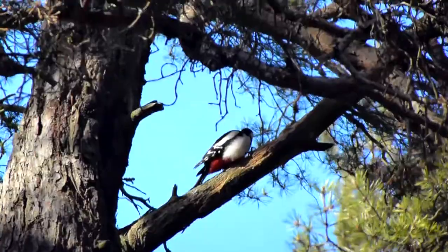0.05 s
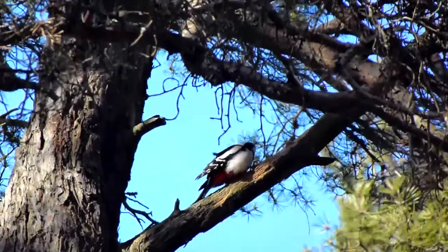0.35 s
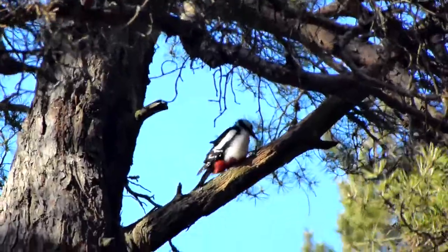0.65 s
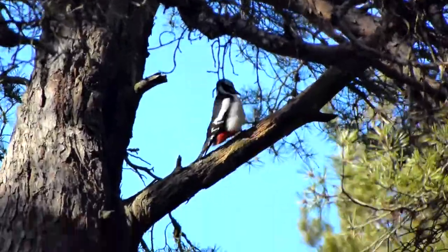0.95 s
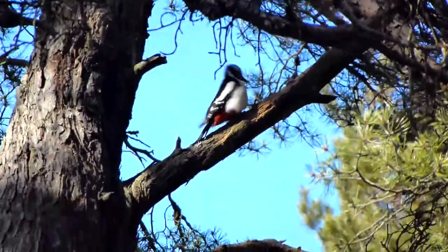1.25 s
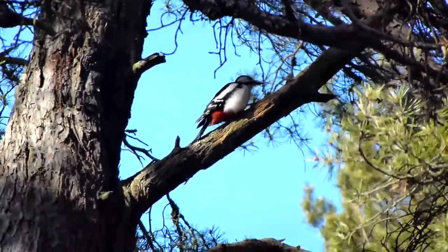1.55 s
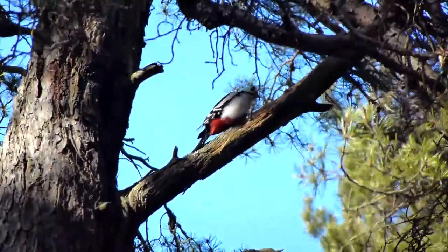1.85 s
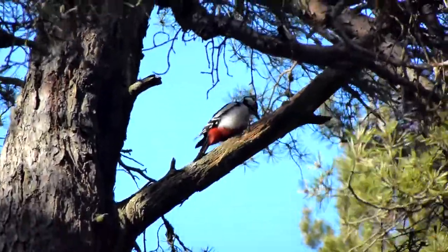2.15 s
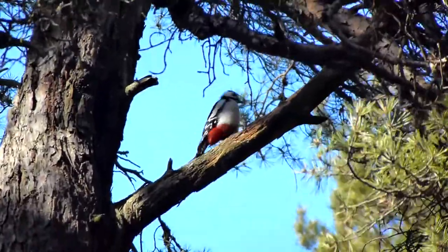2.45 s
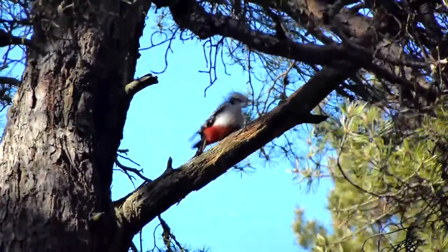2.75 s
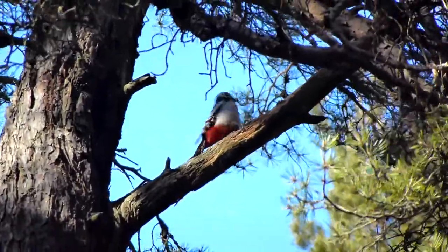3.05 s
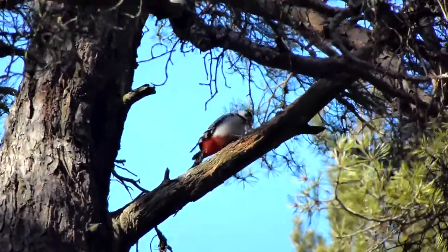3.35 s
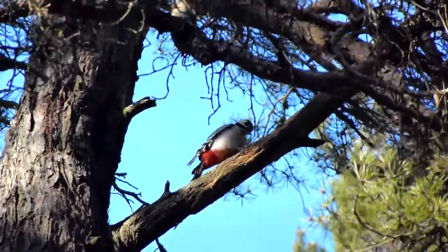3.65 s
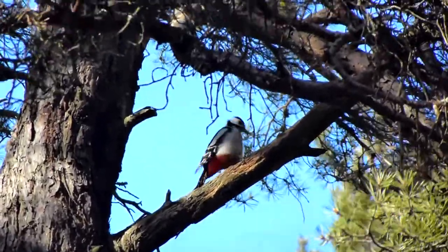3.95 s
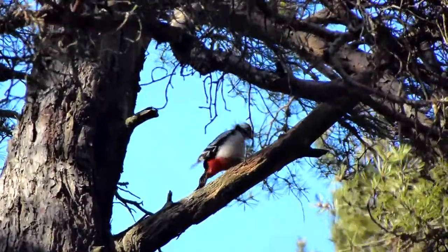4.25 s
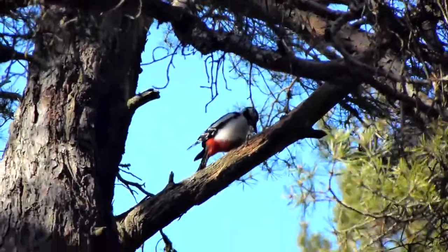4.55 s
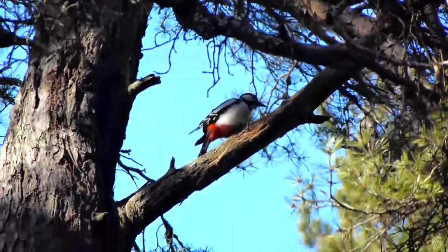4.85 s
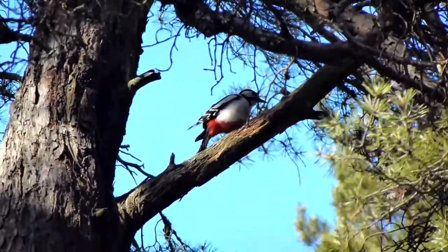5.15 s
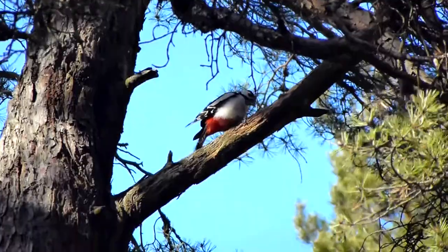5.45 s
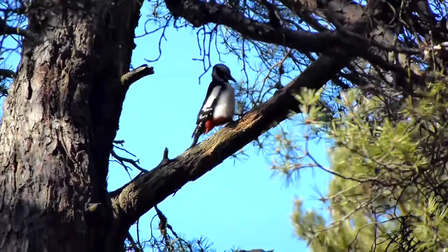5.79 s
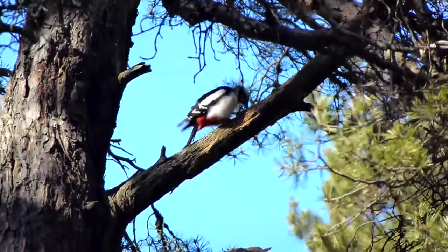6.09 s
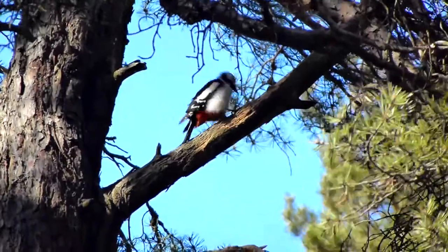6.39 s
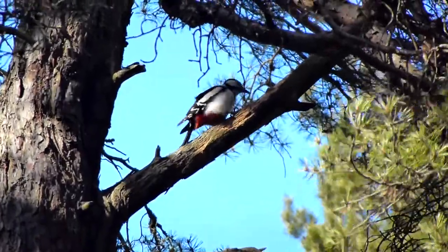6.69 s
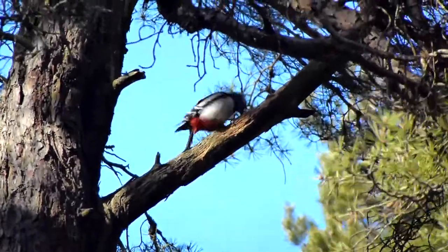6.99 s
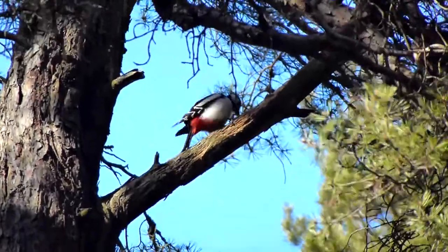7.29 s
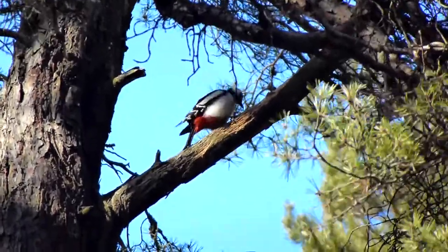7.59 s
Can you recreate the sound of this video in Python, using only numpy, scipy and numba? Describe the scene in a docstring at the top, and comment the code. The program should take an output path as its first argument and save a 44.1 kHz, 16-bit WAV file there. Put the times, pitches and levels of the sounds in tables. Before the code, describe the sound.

Wind buffets the microphone for the whole eight seconds with a low, uneven rumble and soft thumps, leaning slightly left. It is the loudest sound: gusty until about 2.7 seconds, lighter until 4, hardest from 4.2 to 5.4, easing around 6, then gusting again from 6.4. Underneath, a woodpecker pecks a dry pine branch in quiet, irregular single blows, each a sharp tick with a bark crack or short woody knock. The clearest fall near 1.1, 2.2, 2.7, 2.9 and 4.1 seconds, with a busier run from 5.2 to 7.3 and a few tiny bark scrapes. Far off, small birds give faint, thin two-note whistles at about 1.3, 3.9 and 6.7 seconds, and quick high raspy chirps between 2.3 and 3.7. A soft, steady rush of treetops lies behind everything.

```python
"""Woodpecker in a breezy wood

A woodpecker pecks and pries at a dry pine branch: the bark ticks and cracks, the wood knocks.
Gusts rumble and thump on a camera's two microphone openings (ports). Behind them the treetops
rush softly and small birds whistle and chirp far off. The camera turns everything down
in the strong gusts and slowly comes back up."""
import sys
import numpy as np
from scipy import signal
from scipy.fft import rfft, irfft, next_fast_len
from scipy.io import wavfile
from scipy.ndimage import uniform_filter1d
from numba import njit

SR = 44100
rng = np.random.default_rng(int(sys.argv[2]) if len(sys.argv) > 2 else 0)


def store_wav(level_fs):
    """Save 16-bit WAV to argv[1]."""
    pcm = np.round(np.clip(np.atleast_2d(level_fs), -1, 1) * 32767)
    wavfile.write(sys.argv[1], SR, pcm.T.astype(np.int16))


N = 345303


def undb(db):
    """Turn decibels into a gain to multiply by."""
    return 10 ** (np.asarray(db) / 20)


def unit(x):
    """Scale to an average strength (rms) of 1."""
    return x / np.sqrt(np.mean(x ** 2))


def curve(points):
    """Join (time, value) points with straight lines, one value a sample."""
    return np.interp(np.arange(N) / SR, *np.transpose(points))


def colour(x, spectrum):
    """Shape the tone of x by (frequency, level) points."""
    hz, db = np.transpose(spectrum)
    size = next_fast_len(x.shape[-1])
    f = np.fft.rfftfreq(size, 1 / SR)
    gain = undb(np.interp(np.log(f + 1), np.log(hz), db))
    return irfft(rfft(x, size) * gain, size)[..., :x.shape[-1]]


def noise(spectrum, channels=2):
    """A separate shaped noise for each channel, of strength 1."""
    return unit(colour(rng.standard_normal((channels, N)), spectrum))


def burst(t, decay_s, spectrum):
    """A dying puff of shaped noise that starts after one millisecond."""
    dying = rng.standard_normal(len(t)) * np.exp(-t / decay_s)
    return unit(colour(np.roll(dying, SR // 1000), spectrum))


def walk(rate):
    """Smooth random wandering of size 1, with `rate` turns a second."""
    hold = max(int(SR / rate), 2)
    steps = np.repeat(rng.standard_normal(N // hold + 2), hold)
    return unit(uniform_filter1d(uniform_filter1d(steps, hold), hold)[:N])


def flicker(rate, depth_db):
    """A restless gain of strength 1."""
    return unit(undb(depth_db * walk(rate)))


def pan(db):
    """Left and right gains of unchanged total power; positive leans left."""
    gains = undb(np.array([db, -db]).reshape(2, -1) / 2)
    return gains / np.sqrt(np.mean(gains ** 2, axis=0))


def ports(x, lead_ms):
    """A sound from a little to the left reaches the left port first."""
    t = np.arange(N) / SR
    return np.array([x, np.interp(t - lead_ms / 1000, t, x)])


def add(track, s, x):
    """Mix x into the track at s seconds."""
    i = max(int(s * SR), 0)
    track[..., i:i + x.shape[-1]] += x[..., :max(N - i, 0)]


def woodland_echo(x, fade_s, level_db, top_hz):
    """Trunks and needles scatter a dull echo that falls 60 dB in fade_s."""
    t = np.arange(SR // 2) / SR
    tail = rng.standard_normal((2, len(t))) * 1000 ** (-t / fade_s) * (1 - np.exp(-t / 0.0078))
    tail = signal.sosfilt(signal.butter(1, top_hz, fs=SR, output="sos"), tail)
    tail /= np.sqrt(np.sum(tail ** 2) / 2)
    return undb(level_db) * signal.fftconvolve(x[None], tail, axes=1)[:, :N]


def treetops(hiss_db=-14.5):
    """Far treetops rush, much alike in both ports, with a fine, quieter hiss."""
    # level of the background rush and hiss, which sinks briefly near 3.9 s: (time [s], level [dB])
    loudness = [(0, -47), (1.5, -47.5), (2.4, -46.5), (3.2, -45), (3.9, -48.5), (4.7, -46), (6.3, -45.5),
                (7.83, -46.5)]
    # tone of the rush and of the hiss: (frequency [Hz], level [dB])
    rush_tone = [(40, 7), (150, -17.5), (400, 4), (750, 1), (1100, -3), (1900, -12), (2700, -21),
                 (4500, -24), (9000, -51)]
    hiss_tone = [(500, -5), (2000, 9), (4000, 3), (6000, 1.5), (9000, 0), (12000, -2.5), (15500, -8.5)]
    rush = ports(noise(rush_tone, channels=1)[0], lead_ms=0.098) + undb(-4.5) * noise(rush_tone)
    rush = unit(rush) * flicker(rate=6, depth_db=0.65)
    hiss = unit(noise(hiss_tone) + undb(-8) * noise(hiss_tone, channels=1))
    return undb(curve(loudness)) * (rush + undb(hiss_db) * hiss)


def birds(note_s=0.125, step_s=0.255, drop_hz=17, sag_hz_per_s=510, whistle_rasp=0.0058, chirp_s=0.032):
    """Thin swelling whistles and quick raspy chirps, fluttering and blurred by the trees."""
    # two-note whistles: (time [s], pitch [Hz], first note [dB], second note [dB])
    whistles = [(1.295, 4320, -58, -60), (3.933, 4260, -61, -55.5), (6.715, 4240, -55, -55.5)]
    # chirps: (time [s], start pitch [Hz], end pitch [Hz], level [dB], rasp [share of the pitch])
    chirps = [(2.322, 5100, 6070, -56, 0.052), (2.405, 6100, 5340, -53.5, 0.055),
              (2.455, 4950, 5130, -60, .006), (2.55, 3180, 3770, -58, .02), (2.725, 4000, 4850, -57, 0.076),
              (2.84, 3850, 4650, -54.5, .066), (2.976, 3900, 4860, -57, 0.054),
              (3.083, 3950, 4600, -61, .06), (3.452, 4900, 6100, -58, .02), (3.657, 5100, 6700, -55, 0.022),
              (5.02, 4680, 4500, -65, .01), (5.85, 4520, 4320, -65, .01)]
    notes = []
    for start, pitch, first_db, second_db in whistles:
        for s, hz, db in [(start, pitch, first_db), (start + step_s, pitch - drop_hz, second_db)]:
            notes.append((s, note_s, hz, hz - sag_hz_per_s * note_s, db, whistle_rasp))
    notes += [(s, chirp_s, *rest) for s, *rest in chirps]
    song, waver, flutter = np.zeros(N), walk(500), flicker(rate=120, depth_db=3.0)
    for s, length, start_hz, end_hz, db, rasp in notes:
        progress = np.linspace(0, 1, int(length * SR))
        now = slice(int(s * SR), int(s * SR) + len(progress))
        hz = (start_hz + (end_hz - start_hz) * progress) * (1 + rasp * waver[now])
        tone = np.sin(2 * np.pi * np.cumsum(hz) / SR)
        add(song, s, undb(db - 6.5) * unit(np.sin(np.pi * progress) * flutter[now] * tone))
    return ports(song, lead_ms=0.041) + woodland_echo(song, fade_s=0.54, level_db=-6.5, top_hz=7000)


def gusts(rise_s=0.016, rumble_fade_s=0.023, flutter_fade_s=0.017):
    """Gusts rise, hold and die away; gives the wind's rumble, flutter and lean to the left in dB."""
    # the light breeze under the gusts: (time [s], rumble [dB])
    breeze = [(0, -27.5), (.7, -27), (.92, -40), (1.3, -28.5), (1.9, -30), (2.05, -37.5), (2.4, -33),
              (2.7, -40), (3.1, -41), (3.29, -48.5), (3.4, -31.5), (4.05, -34), (4.5, -19.5), (5.4, -22.5),
              (6.1, -39.5), (7.1, -29.5), (7.6, -30), (7.83, -42.5)]
    # gusts at the microphone: (time [s], length [s], rumble [dB], flutter [dB], lean left [dB])
    blasts = [(0.045, 0.055, -19.5, -22, 5), (0.165, 0.037, -17.9, -23, 4),
              (0.265, 0.067, -23.5, -30.5, 0.5), (0.37, 0.301, -20.5, -21, 3.0),
              (0.725, 0.14, -24.5, -28, 4.6), (0.955, 0.016, -24.5, -49, 5.5),
              (1.024, 0.076, -21, -31.6, 8.7), (1.115, 0.314, -18, -19.5, 4.5),
              (1.53, 0.13, -23.5, -31.5, 6), (1.72, 0.1, -20.5, -26.5, -1.8), (1.866, 0.052, -23, -37, 5.5),
              (2.071, 0.025, -28, -46.4, 2.5), (2.2, 0.046, -29.5, -49.9, 8), (2.28, 0.14, -23.1, -27, 5),
              (2.439, 0.082, -17, -21.5, 7), (2.523, 0.13, -21, -26.5, -0.5), (2.714, 0.085, -25, -46, 4.2),
              (2.847, 0.11, -28, -47, 3), (3.004, 0.047, -27, -41.9, 6.5), (3.331, 0.14, -29, -36, 4),
              (3.48, 0.076, -25, -26.5, 6), (3.57, 0.52, -30, -43.5, 8.5), (4.1, 0.084, -25.5, -40, 1.5),
              (4.17, 0.273, -18.5, -20, 4.6), (4.48, 0.13, -20, -23, 3.9), (4.657, 0.67, -21.5, -22.1, 4.5),
              (5.35, 0.081, -26, -31.5, 8.5), (5.536, 0.25, -24.5, -34, 4), (5.855, 0.49, -32, -54, 3),
              (6.446, 0.13, -22.5, -36.5, 8.7), (6.668, 0.1, -32, -55, -2), (6.82, 0.097, -22.5, -29, -4.5),
              (6.919, 0.19, -28, -36, 5.5), (7.139, 0.11, -21.5, -28.5, 3.5), (7.28, 0.27, -26, -37, 4.3)]
    t = np.arange(SR) / SR
    rumble, flutter = undb(curve(breeze)) ** 2, np.full(N, 1e-9)
    lean = rumble * 3  # the breeze leans a little to the left
    for s, length, rumble_db, flutter_db, pan_db in blasts:
        rise, after = np.minimum(t / rise_s, 1), np.maximum(t - length, 0)
        power = (undb(rumble_db) * rise * np.exp(-after / rumble_fade_s)) ** 2
        add(rumble, s, power)
        add(lean, s, power * pan_db)
        add(flutter, s, (undb(flutter_db) * rise * np.exp(-after / flutter_fade_s)) ** 2)
    puff_db, veer_db = 1.65 * walk(rate=30), 2.5 * walk(rate=20)  # chance swings of strength and side
    return (10 * np.log10(rumble) + puff_db,
            10 * np.log10(flutter) + 1.4 * puff_db,
            lean / rumble + veer_db)


def wind(rumble_db, flutter_db, pan_db):
    """Wind rumbles on each port; its mid-pitched flutter sounds wide, partly opposite left and right."""
    # tone of the rumble, the flutter and the flutter's wide part: (frequency [Hz], level [dB])
    rumble_tone = [(15, -22), (30, -20.5), (50, -3.5), (80, 0.5), (130, 2), (200, -2.5), (280, -9),
                   (400, -19.5), (700, -36), (1500, -77)]
    flutter_tone = [(90, -52), (180, -17), (270, 4.5), (400, -3), (600, -11), (900, -25.5), (1400, -35),
                    (2200, -55.5), (4000, -62), (8000, -85)]
    wide_tone = [(150, -27.5), (280, 3.5), (420, -1.5), (600, -5), (900, -17.5), (1400, -30.5), (2200, -44),
                 (5000, -68)]
    throb = flicker(rate=75, depth_db=2.04)  # passing swirls shake all of it together
    rumble = noise(rumble_tone) * undb(rumble_db) * pan(1.23 * pan_db)
    flutter = noise(flutter_tone) * pan(0.72 * pan_db)
    flutter += undb(-5) * noise(wide_tone, channels=1) * np.array([[1], [-1]])
    return throb * (rumble + unit(flutter) * flicker(rate=240, depth_db=5.0) * undb(flutter_db))


def small_swirls(rumble_db, flutter_db, pan_db, per_s=10, scatter_db=2.5):
    """Lesser swirls arrive by chance, as strong as the wind that carries them; rows for swirls()."""
    arrivals = np.flatnonzero(rng.random(N) < per_s / SR)
    edge_db, thump_db = scatter_db * rng.standard_normal((2, N))
    return [(i / SR, flutter_db[i] - 9.5 + edge_db[i], rumble_db[i] + 0.5 + thump_db[i], pan_db[i])
            for i in arrivals]


def swirls(lesser, ring_hz=200, ring_s=0.0035, pitch_spread=0.096, far_port_db=-5):
    """A swirl of air kicks one port and rings briefly; the other gets its sharp edge upside down."""
    # the hardest swirls: (time [s], sharp edge [dB], thump [dB], lean left [dB])
    hardest = [(.389, -31, -10, 9), (.655, -19.5, -24, 6), (.833, -29, -15.5, 3), (1.148, -24, -12, 4),
               (1.395, -33, -9, 3), (1.443, -25, -13.5, 13), (1.561, -29.5, -27, -8),
               (1.763, -28, -12.5, -5), (2.324, -29, -25, 0), (2.36, -30, -24, 3), (2.485, -16, -20, -1),
               (3.402, -44, -20.5, 4), (3.5, -37, -22, 4), (4.187, -37, -10.5, -2), (4.208, -20, -17, 12),
               (4.295, -20, -23, 0), (4.315, -18, -13, -2), (4.354, -20.5, -6.5, 3),
               (4.58, -18, -18.5, 0.5), (4.808, -17.5, -8.5, 3), (4.83, -17.5, -11, 4),
               (4.914, -29, -19, -0.5), (4.973, -27, -17, 2.5), (5.24, -20.5, -13, 8),
               (5.294, -20.5, -10.5, 3), (5.556, -28, -18, .5), (5.628, -29.5, -15, .5),
               (6.171, -52, -26.5, 9), (6.283, -52, -27, 0), (6.48, -41, -17.5, 4), (6.877, -17, -15.5, 0),
               (7.16, -29, -17, 5), (7.302, -33, -17.5, 7), (7.358, -28.5, -14, 8), (7.485, -48, -17, 0)]
    # tone of the sharp edge: (frequency [Hz], level [dB])
    edge_tone = [(60, -21.5), (200, -15.5), (400, 6.5), (600, -6.5), (900, -7.5), (1400, -27),
                 (2000, -45.5), (3000, -51), (6000, -70.5)]
    out, rows = np.zeros((2, N)), hardest + lesser
    t = np.arange(-SR // 100, SR // 30) / SR
    kick = signal.hilbert(colour(1. * (t == 0), edge_tone))
    kick /= np.abs(kick).max()
    swell = 2.48 / (np.exp(-t / 0.00093) + np.exp(t / ring_s))
    for s, edge_db, thump_db, pan_db in rows:
        detune, turn = rng.standard_normal(2)
        phase = np.exp(1j * np.pi * turn)  # each swirl has its own wave shape
        hz = ring_hz * np.exp(pitch_spread * detune)
        thump = undb(thump_db) * swell * np.real(phase * np.exp(2j * np.pi * hz * t))
        edge = undb(edge_db + 17.5) * np.real(phase * kick)
        sides = np.array([[1], [-undb(far_port_db)]])[::1 if pan_db > 0 else -1]
        add(out, s + t[0] + 0.001483, thump * pan(pan_db) + edge * sides)
    return out


def scrapes():
    """The beak scrapes loose bark, and flakes give way in a dense run of tiny snaps."""
    # strokes of the beak: (time [s], length [s], level [dB])
    strokes = [(2.155, .06, -67), (4.147, .04, -66), (5.295, .039, -61), (5.335, 0.043, -58),
               (6.725, .09, -67), (7.083, 0.068, -61)]
    # tone of the flaking bark: (frequency [Hz], level [dB])
    flake_tone = [(1500, -11), (3500, -5), (7000, 3), (11000, -5), (15500, -14)]
    pressure = np.zeros(N)
    for s, length, db in strokes:
        add(pressure, s, undb(db) * signal.windows.tukey(int(length * SR)))
    snaps = noise(flake_tone, channels=1)[0] * flicker(rate=830, depth_db=6)
    return ports(snaps * pressure, lead_ms=0.02)


def pecks(tick_s=0.00095, crack_s=0.0041, splinter_s=0.0044, push_s=0.00077):
    """The beak tip ticks, the bark cracks and splinters, and the branch gives a short dry knock."""
    # beak blows and snapping bark: (time [s], wood [dB], crack [dB], tick [dB])
    blows = [(0.5238, -55.5, -67, -69), (0.8915, -51, -55.5, -74), (1.1246, -44.5, -63, -58),
             (1.415, -57, -68, -68), (2.15, -41.5, -55, -45.5), (2.5375, -69, -64, -57),
             (2.6705, -47, -54, -48), (2.8878, -45, -51.5, -62), (3.2244, -54, -58, -53),
             (3.291, -73, -73, -60), (3.4126, -60, -59, -60), (3.5953, -52, -62, -59),
             (4.143, -47, -57, -48.5), (4.2922, -55, -61, -52), (5.1906, -70, -70, -56),
             (5.2131, -80, -80, -51), (5.2914, -76, -73, -47), (5.3394, -72, -68, -59),
             (5.7784, -49.5, -61, -50), (5.9534, -51.5, -65, -55), (6.206, -58, -67, -58),
             (6.413, -57, -66, -57), (6.637, -56, -62, -60), (6.745, -62, -63, -58), (6.794, -65, -63, -61),
             (6.8746, -48.5, -59, -66), (6.9514, -63, -70, -48), (6.9576, -65, -61, -41),
             (7.0856, -54, -59, -49), (7.1492, -54, -62, -62), (7.3193, -55, -58, -55)]
    # the notes the branch rings at: (frequency [Hz], time to fade by 60 dB [s], level [dB])
    branch = [(855, 0.028, 13.5), (1450, 0.017, -7.5), (1900, 0.0074, -2.5), (2260, 0.0084, 3),
              (3000, 0.0049, 1), (3640, 0.0044, -2.5)]
    # tone of the splinters, the crack and the tick: (frequency [Hz], level [dB])
    splinter_tone = [(500, -3), (1000, 0.5), (1600, 0.5), (2600, 0.5), (3700, -2), (5000, -15.5),
                     (9000, -29.5)]
    crack_tone = [(1500, -19), (3000, -14.5), (3800, 4), (4800, 6.5), (6500, 0), (9000, -8), (15000, -32)]
    tick_tone = [(2500, -39.5), (5500, -7), (8500, 3), (12000, -1), (15500, -8)]
    wood, ticks = np.zeros((2, N))
    t = np.arange(SR // 40) / SR
    hz, fade_s, ring_db = np.transpose(branch)[:, :, None]
    for s, wood_db, crack_db, tick_db in blows:
        detune = 1 + 0.056 * rng.standard_normal(hz.shape)  # every blow lands on another spot
        rings = undb(ring_db) * np.sin(2 * np.pi * hz * detune * t) * 1000 ** (-t / fade_s)
        ringing = rings[::2].sum(0) - rings[1::2].sum(0)  # every second note starts upside down
        knock = unit(ringing * (1 - np.exp(-t / push_s)))
        add(wood, s + 0.000974, undb(wood_db - 12) * knock)
        add(wood, s, undb(wood_db - 2.5) * burst(t, splinter_s, splinter_tone))
        add(wood, s, undb(crack_db - 3.5) * burst(t, crack_s, crack_tone))
        add(ticks, s, undb(tick_db - 9.5) * burst(t, tick_s, tick_tone))
    echo = woodland_echo(wood, fade_s=0.18, level_db=-8, top_hz=4500)
    return ports(wood + ticks, lead_ms=0.026) + echo


@njit
def follow(wanted, start, attack, recover):
    """Rise quickly towards the wanted value, sink back at a steady rate."""
    out, now = np.empty(len(wanted)), start
    for i in range(len(wanted)):
        now = now + (wanted[i] - now) * attack if wanted[i] > now else max(now - recover, wanted[i])
        out[i] = now
    return out


def scene():
    """Wind on the microphone in front of the woodpecker, the small birds and the trees."""
    forest = pecks() + scrapes() + birds() + treetops()
    air = gusts()
    return forest + wind(*air) + swirls(small_swirls(*air))


def record(dry):
    """The camera turns itself down when the sound is loud, and cuts the highest treble."""
    threshold_db, cut_per_db, start_cut_db = -30, 0.597, 6.0
    average_s, attack_s, recover_db_per_s = 0.012, 0.033, 8
    bass_hz, top_hz = 140, 15800
    # deep bass counts for less when the camera judges loudness
    sensed = signal.sosfilt(signal.butter(1, bass_hz, "high", fs=SR, output="sos"), dry)
    power = uniform_filter1d(np.mean(sensed ** 2, axis=0), int(average_s * SR))
    level_db = 10 * np.log10(np.abs(power) + 1e-18)
    wanted_db = cut_per_db * np.maximum(level_db - threshold_db, 0)
    cut_db = follow(wanted_db, start_cut_db, 1 / (attack_s * SR), recover_db_per_s / SR)
    return signal.sosfilt(signal.ellip(10, .1, 80, top_hz, fs=SR, output="sos"), dry * undb(-cut_db))


dry = scene()
out = record(dry)
store_wav(out)
```